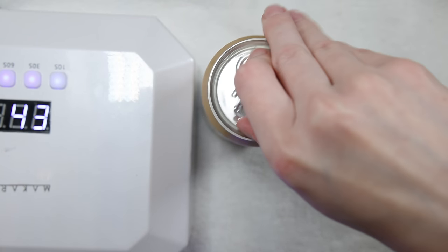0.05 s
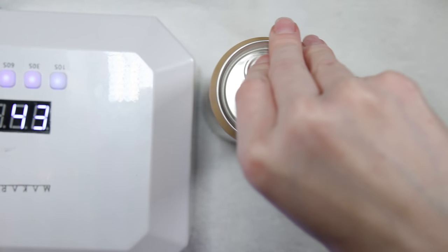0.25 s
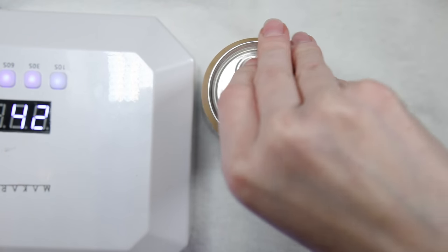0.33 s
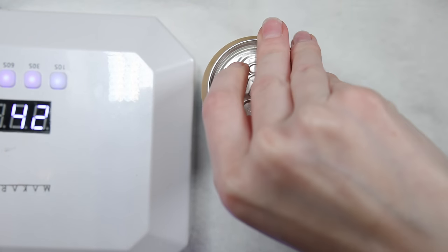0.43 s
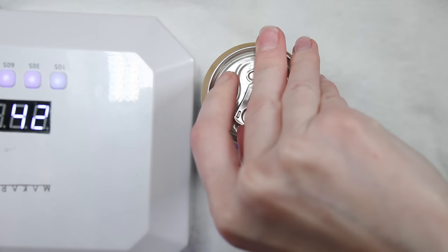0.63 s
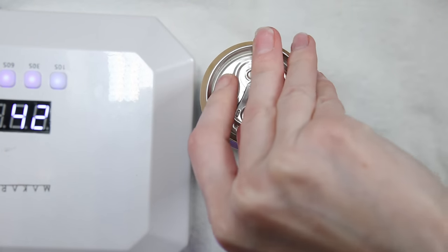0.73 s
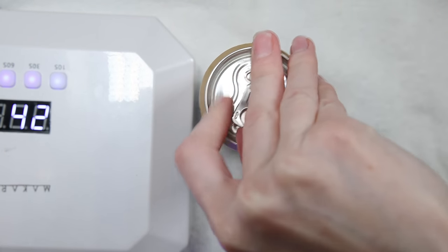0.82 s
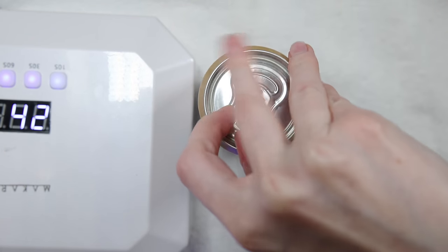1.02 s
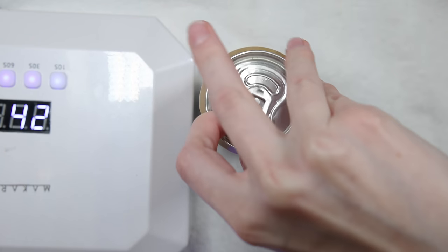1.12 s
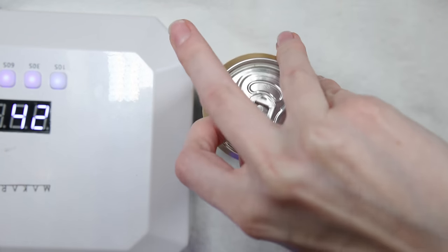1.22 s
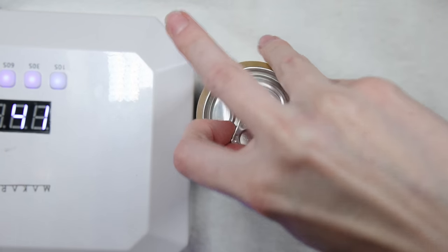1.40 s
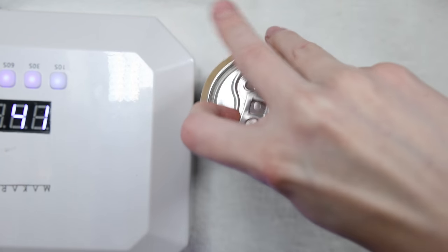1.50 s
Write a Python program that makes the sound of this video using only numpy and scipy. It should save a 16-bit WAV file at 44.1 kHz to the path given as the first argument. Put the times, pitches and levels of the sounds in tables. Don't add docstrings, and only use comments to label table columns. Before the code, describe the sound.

Fingernails flick a metal can tab, making two sharp ringing snaps, then light scratches and taps

```python
import sys
import numpy as np
from scipy import signal
from scipy.fft import rfft, irfft
from scipy.io import wavfile

SR = 44100
rng = np.random.default_rng(int(sys.argv[2]) if len(sys.argv) > 2 else 0)


def natural_amplitude(level_db):
    exponent = np.asarray(level_db, float) / 20
    return 10 ** exponent


def output_pcm(signal):
    pcm = np.clip(np.atleast_2d(signal).T, -1, 1) * 32767
    wavfile.write(sys.argv[1], SR, np.round(pcm).astype(np.int16))


N = 68355


def rms_one(x):
    return x / np.sqrt(np.mean(x ** 2) + 1e-20)


def at_hz(points, hz):
    points = np.array(points)
    return np.interp(np.log(hz), np.log(points[:, 0]), points[:, 1])


def drift(rate_hz):
    every, warm_up = 40, 2000
    r = np.exp(-2 * np.pi * rate_hz * every / SR)
    noise = rng.standard_normal(N // every + 2 + warm_up)
    slow = rms_one(signal.lfilter([1], [1, -2 * r, r * r], noise)[warm_up:])
    return np.interp(np.arange(N) / every, np.arange(len(slow)), slow)


def ring(clicks, hz, t60):
    r = natural_amplitude(-60 / (t60 * SR))
    w = 2 * np.pi * hz / SR
    return signal.lfilter([0, np.sin(w)], [1, -2 * r * np.cos(w), r * r], clicks + 1e-18)


def bands(x, gain):
    edges = 16 * 2 ** np.arange(0, 10.1, 1 / 3)
    total = 0
    for k, (low, high) in enumerate(zip(edges, edges[1:])):
        band = signal.butter(2, [low, high], "band", fs=SR, output="sos")
        total = total + gain(np.sqrt(low * high)) * signal.sosfilt(band, x[k % len(x)])
    return total


def colour(x, spectrum):
    hz = np.maximum(np.arange(len(x) // 2 + 1) * SR / len(x), 1)
    return irfft(rfft(x) * natural_amplitude(at_hz(spectrum, hz)), len(x))


def air():
    # f/Hz, level/dB
    air_spectrum = [(15, -3), (70, -4.5), (150, -3.5), (700, -17.5), (2600, -24), (3600, -21.5),
                    (13300, -27), (16300, -31)]
    air_db = -61.5
    # f/Hz, rms level/dB
    hum_lines = [(28, -63.5), (50, -64.5), (150, -72.5), (165, -76.5), (250, -77), (1014, -76.5)]
    wobble_db = 0.5
    t = np.arange(N) / SR
    hum = np.zeros(N)
    for hz, db in hum_lines:
        level = np.sqrt(2) * natural_amplitude(db + wobble_db * drift(4.5))
        hum += level * np.sin(2 * np.pi * hz * t + 0.89 * drift(3.9))
    return natural_amplitude(air_db) * rms_one(colour(rng.standard_normal(N), air_spectrum)) + hum


def rustle():
    # t/s, level/dB
    pressure = [(0, -68), (.2, -70.5), (.4, -66), (.55, -61), (.68, -64), (.78, -61), (.84, -59.5),
                (.92, -58), (1.0, -59), (1.1, -62.5), (1.2, -62), (1.28, -70), (1.4, -62.5), (1.55, -71.5)]
    # f/Hz, level/dB
    skin_spectrum = [(240, -35), (400, -20), (507, 1), (575, -7), (1020, -0.5), (1590, -9.5), (2290, -2),
                     (6000, -21), (7800, -41), (13200, -120)]
    trim_db, grains_per_s = -2, 4000
    s, db = np.transpose(pressure)
    grains = (rng.random(N) < grains_per_s / SR) * rng.standard_normal(N)
    band = signal.butter(2, [500, 5000], "band", fs=SR, output="sos")
    level_db = np.interp(np.arange(N) / SR, s, db) + trim_db + 0.75 * drift(10.3)
    return natural_amplitude(level_db) * rms_one(signal.sosfilt(band, colour(grains, skin_spectrum)))


def scratches():
    # t/s, length/s, level/dB, centre f/Hz, spread/octaves
    strokes = [(0.038, 0.0076, -59.5, 2140, .2), (0.094, 0.011, -62.5, 2230, .15),
               (0.144, 0.0065, -56.5, 2340, 0.23), (0.156, 0.013, -64, 2800, 0.19),
               (0.593, 0.012, -62.5, 2820, 0.68), (0.825, 0.019, -55.5, 2770, 0.19),
               (0.859, 0.051, -60, 8000, 1.5), (.882, 0.0041, -48, 8000, 1.05),
               (0.816, 0.091, -55, 4600, .5), (0.882, .01, -50, 1980, 0.088),
               (1.207, 0.024, -64, 2200, .15), (1.32, 0.017, -51.5, 2020, 0.17),
               (1.316, 0.031, -52.5, 3400, 0.19), (1.32, 0.023, -47.5, 1250, 0.18),
               (1.382, 0.031, -62, 2220, .1), (1.397, 0.031, -53.5, 3120, 0.37),
               (1.4, 0.024, -47, 5380, 0.064), (1.407, 0.017, -56, 1250, 0.22),
               (1.412, 0.027, -54.5, 2220, 0.054), (1.494, 0.024, -73, 2200, .1)]
    lid_hz = [1250, 1990, 2125, 2212, 2690, 2800, 3150, 3530, 4800, 5510, 7610, 8090, 11600, 13800]
    # level/dB, t60/s
    lid_modes = [(-11, .06), (-6, .03), (-3, .035), (0, .065), (-6, .05), (-4, .07), (-8, .025), (-8, .035),
                 (-10, .012), (-3, .02), (-8, .011), (-7, .01), (-9, .007), (0, .009)]
    slips_per_s, scrape_db = 3600, -8
    t = np.arange(N) / SR
    slips = (rng.random(N) < slips_per_s / SR) * rng.standard_normal(N)
    swells = []
    for s, length, *_ in strokes:
        arch = np.sin(np.pi * np.clip((t - s) / length, 0, 1)).clip(0)
        swells.append(np.sqrt(arch / (length * slips_per_s)))

    def force(hz):
        total = np.zeros(N)
        for swell, (_, _, db, centre_hz, spread) in zip(swells, strokes):
            total += natural_amplitude(db - 6 * (np.log2(hz / centre_hz) / spread) ** 2) * swell
        return total

    out = 10 * natural_amplitude(scrape_db) * bands(rng.standard_normal((2, N)), force)
    for hz, (mode_db, t60) in zip(lid_hz, lid_modes):
        own_slips = np.roll(slips, rng.integers(N))
        out += ring(2 * natural_amplitude(mode_db) * force(hz) * own_slips, hz, t60)
    return out


def taps():
    # t/s, peak level/dB, f/Hz, t60/s
    knocks = [
        (.044, -45.5, 1480, 0.0097),
        (0.0471, -51.5, 2650, 0.026),
        (.936, -53, 11200, .002),
        (1.109, -48, 1430, 0.017),
        (1.265, -51.5, 321, 0.045),
        (0.438, -50.5, 168, 0.17),
        (.44, -51.5, 118, 0.23),
    ]
    samples = np.arange(N)
    return sum(ring(natural_amplitude(db) * (samples == int(s * SR)), hz, t60) for s, db, hz, t60 in knocks)


def snaps():
    # t/s, peak level/dB, crack level/dB, room level/dB
    slip_offs = [
        (0.2014, -25.5, -6, 8.5),
        (0.4356, -19.5, -9.5, 2.5),
        (.9589, -38, -10.5, 8),
    ]
    pitches_a = [2361, 1880, 2180, 2229, 2482, 2700, 2800, 3022, 3186, 3620, 3850, 2846, 2600, 5300]
    pitches_b = [1252, 1987, 2180, 2228, 2286, 2640, 2731, 2800, 2963, 3403, 3528, 2400, 4650, 950]
    pitches_c = [2530, 2680, 2800, 3200, 3550, 3850, 4100, 5100, 6000]
    # level/dB, t60/s
    modes_a = [(-12, .09), (-15, .05), (-1, .05), (-11, .1), (-10, .1), (-3, .1), (-6, .08), (-6, .09),
               (-10, .07), (-10, .08), (-12, .07), (-7, .09), (0, .02), (-9, .015)]
    modes_b = [(-18, .12), (-10, .06), (-10, .06), (0, .09), (-14, .08), (-14, .09), (-7, .12), (-10, .15),
               (-15, .08), (-20, .14), (-17, .12), (-2, .02), (-13, .015), (-19, .02)]
    modes_c = [(-16, .12), (-10, .14), (0, .05), (-12, .06), (-8, .07), (-7, .07), (-9, .06), (-14, .03),
               (-13, .03)]
    # f/Hz, level/dB
    crack_a = [(900, -30), (1600, -24), (2200, -7), (3500, 3), (5500, -1), (9000, -15.5), (11000, -21),
               (14000, -22)]
    crack_b = [(400, -7.5), (800, -1.5), (1600, -21), (3000, 10.5), (5000, 10.5), (9000, 4), (11500, -4.5),
               (14000, -12)]
    crack_c = [(1500, -41), (2400, -15), (3800, 1), (6000, -6), (9000, -15), (14000, -22)]
    low_cuts = [1850, 580, 2400]
    crack_t60_s, onset_s, ring_room_db = 0.022, 0.00035, -14
    grips = zip(slip_offs, (pitches_a, pitches_b, pitches_c), (modes_a, modes_b, modes_c),
                (crack_a, crack_b, crack_c), low_cuts)
    out, feed = np.zeros(N), np.zeros(N)
    t = np.arange(SR // 3) / SR
    onset = 1 - np.exp(-t / onset_s)
    for (s, db, crack_db, room_db), pitches, modes, crack, cut_hz in grips:
        tone = sum(natural_amplitude(mode_db) * ring(1. * (t == 0), hz, t60) for hz, (mode_db, t60) in zip(pitches, modes))
        thin = signal.butter(4, cut_hz, "high", fs=SR, output="sos")
        tone = signal.sosfilt(thin, onset * tone)
        tone = natural_amplitude(db) * tone / np.abs(tone).max()
        burst = rms_one(colour(rng.standard_normal(len(t)), crack))
        burst = burst * onset * natural_amplitude(db + crack_db - 60 * t / crack_t60_s)
        click = colour(1. * (np.arange(len(t)) == 40), crack)
        click = natural_amplitude(db) * click / np.sqrt(np.sum(click ** 2))
        i = int(s * SR)
        out[i:i + len(t)] += tone + signal.sosfilt(thin, burst)
        feed[i:i + len(t)] += natural_amplitude(room_db) * (click + natural_amplitude(ring_room_db) * tone)
    return out, feed


def room(x):
    # f/Hz, t60/s
    decay = [(700, 0.34), (2500, 0.2), (6000, 0.21), (14000, 0.23)]
    gap_s = 0.006
    t = np.arange(SR // 3) / SR
    tail = bands(rng.standard_normal((2, len(t))), lambda hz: natural_amplitude(-60 * t / at_hz(decay, hz)))
    tail = tail * np.clip(t / gap_s, 0, 1) ** 2
    return signal.fftconvolve(x, tail / np.sqrt(np.sum(tail ** 2)))[:N]


def scene():
    touch_room_db = -6
    snap, snap_feed = snaps()
    touch = scratches() + taps()
    echo = room(snap_feed + natural_amplitude(touch_room_db) * touch)
    return (snap + touch + echo + rustle() + air())[None]


def roll_off(x):
    return signal.sosfilt(signal.butter(12, 16450, fs=SR, output="sos"), x)


def record(dry):
    cutoff_hz = 16300
    low_pass = signal.cheby2(12, 50, cutoff_hz, fs=SR, output="sos")
    return roll_off(signal.sosfilt(low_pass, dry))


dry = scene()
out = record(dry)
output_pcm(out)
```